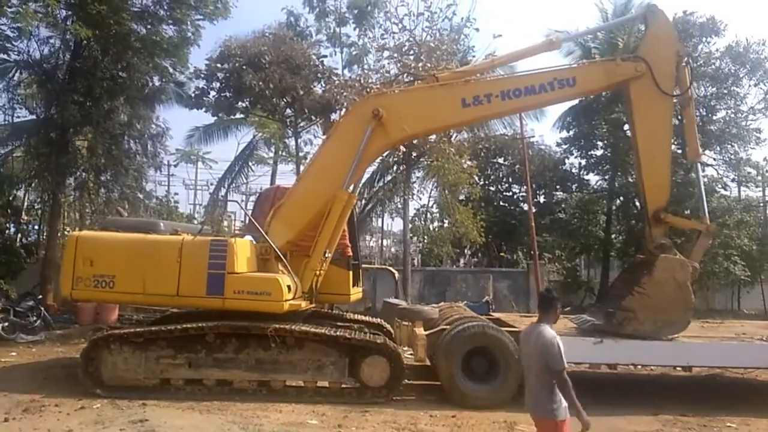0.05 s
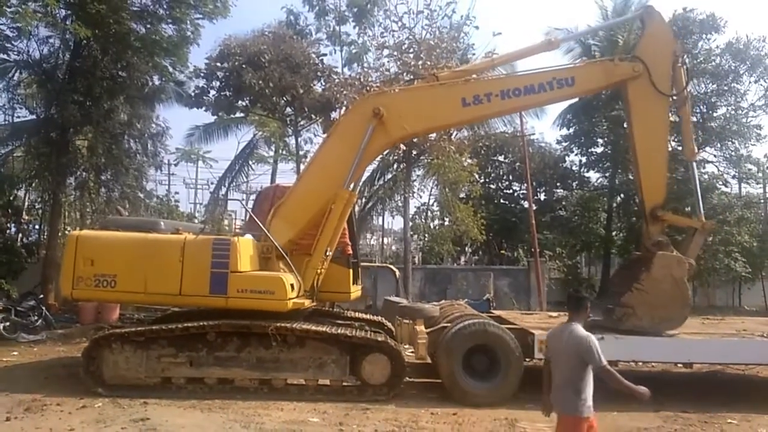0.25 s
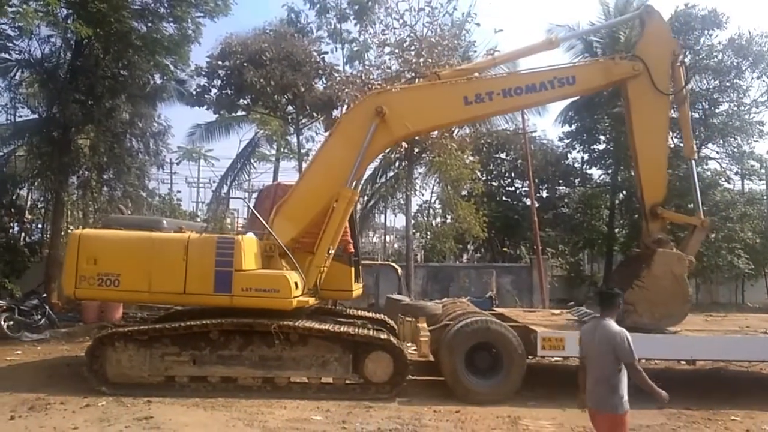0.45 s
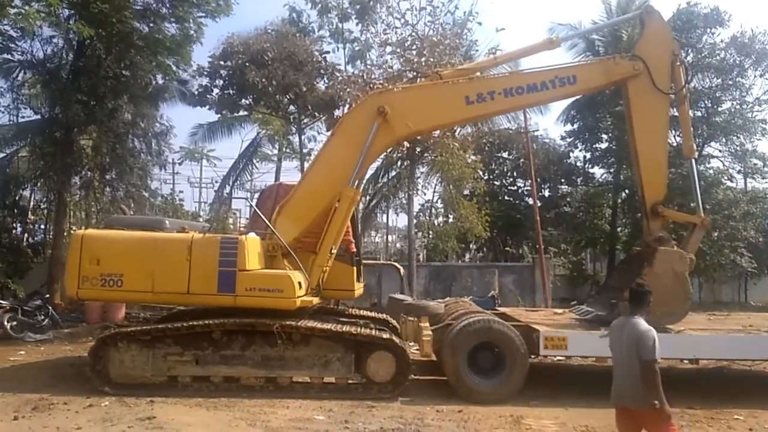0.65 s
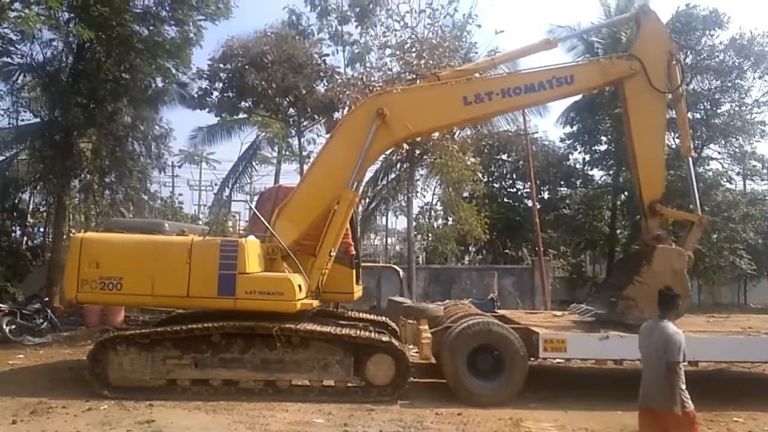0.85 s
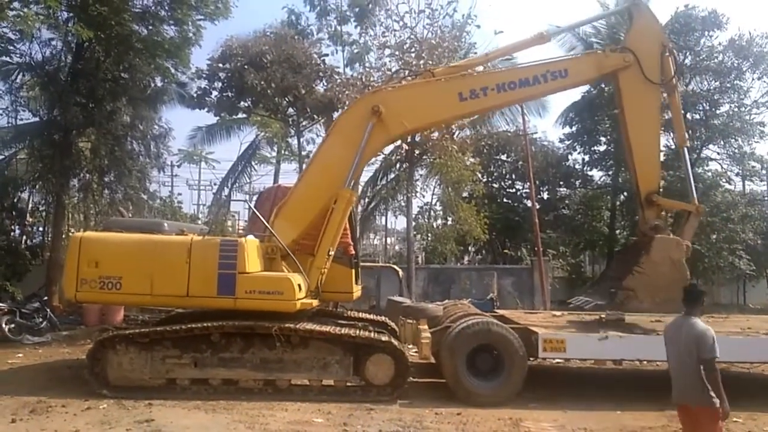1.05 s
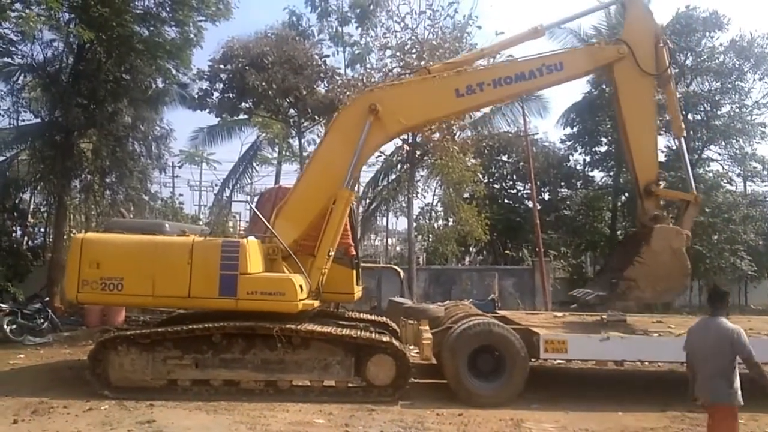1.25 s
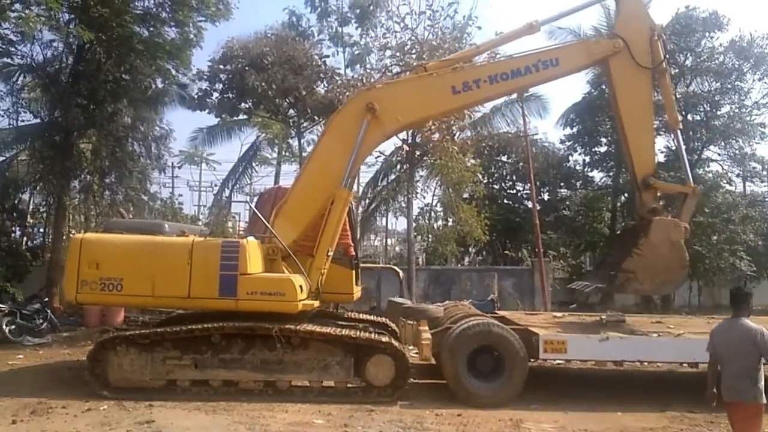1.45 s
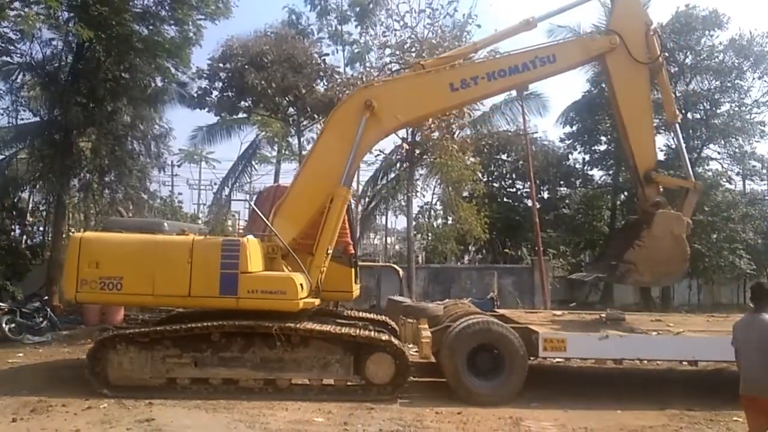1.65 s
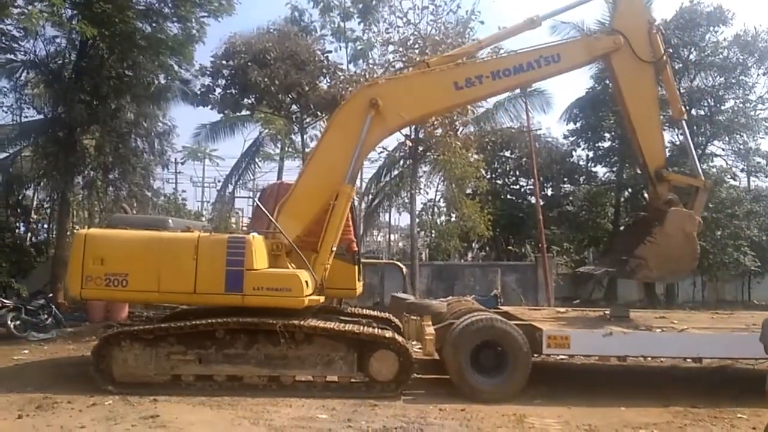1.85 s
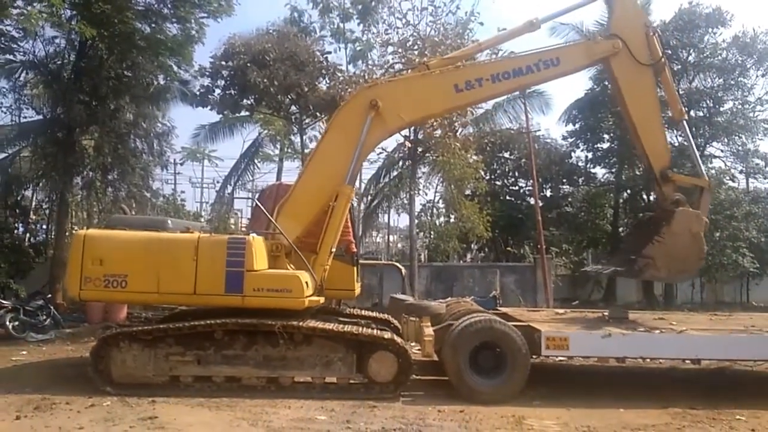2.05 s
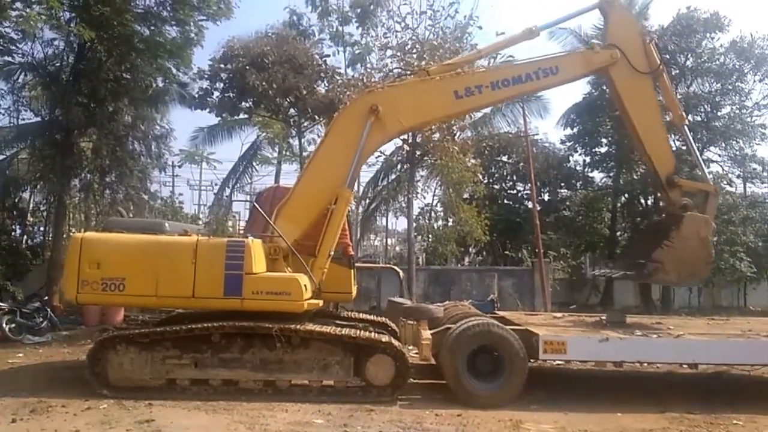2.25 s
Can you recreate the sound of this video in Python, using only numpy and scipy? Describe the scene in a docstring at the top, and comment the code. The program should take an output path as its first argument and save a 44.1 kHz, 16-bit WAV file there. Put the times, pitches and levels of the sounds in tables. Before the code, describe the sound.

A steel trailer deck thumps under an excavator, slightly to the left. From about 0.2 seconds, quick clanging knocks and hollow booms pile over a low groan, loudest near 0.4 and fading by 0.8. A faint diesel hum, hydraulic whine and outdoor rumble continue underneath. Loose steel clinks at 1.8 seconds, drops with one sharp bang around 2.0, then clinks lightly near 2.3.

```python
"""An open lot, where an excavator shifts its weight against a steel low-bed trailer, left of the mics.
The hollow deck groans under the load, takes a run of heavy knocks that clang on its plate, and booms
as it rocks to rest on its shaking frame. Later loose steel clinks and drops with one sharp bang.
Underneath, the diesel hums faintly, its hydraulic pump whines and the open air rumbles and hisses."""
import sys
import numpy as np
from scipy import signal
from scipy.fft import rfft, irfft
from scipy.io import wavfile

SR = 44100
rng = np.random.default_rng(int(sys.argv[2]) if len(sys.argv) > 2 else 0)


def master_out(mix):
    """Clip the mix to full scale and print it as 16-bit PCM to the path in sys.argv[1]."""
    frames = np.transpose(np.atleast_2d(mix))
    ceiling = np.clip(frames, -1, 1)
    pcm = np.round(ceiling * 32767).astype(np.int16)
    wavfile.write(sys.argv[1], SR, pcm)


N = 105840
T = np.arange(N) / SR
FFT_SIZE = 2 ** 17
HZ = np.maximum(np.arange(FFT_SIZE // 2 + 1) * SR / FFT_SIZE, 1)
SIDES = np.array([[.5], [-.5]])  # splits a left-minus-right level between the two microphones
DECK_PAN_DB = 4.5

# how much louder the trailer's noise is at the left microphone: frequency_hz, left_minus_right_db
TRAILER_BALANCE = [(60, 3.5), (350, 3), (700, 4), (1300, -1.5), (2000, 6.5), (2800, 16), (4400, 4.5),
                   (8000, -0.5), (15000, 5)]


def deck_thumps():
    """The deck rocks: each thump booms in its hollow, flexes the frame and shoves it into ringing."""
    # thumps of the rocking deck: start_s, boom_db, boom_hz, frame_db, flex_hz
    thumps = [(0.229, -26.5, 305, -29.5, 175), (0.255, -24, 290, -23.5, 158), (0.285, -17.5, 294, -42, 150),
              (0.312, -22.5, 297, -28.5, 106.4), (0.338, -19, 298, -29.5, 178),
              (0.348, -10, 291.2, -40.5, 150), (0.377, -35, 266, -23.5, 122.2),
              (0.429, -13, 304, -22.5, 184), (0.446, -6, 300.4, -25, 152.4), (0.494, -20, 292.4, -25, 192),
              (0.511, -14, 295, -28.5, 207), (0.560, -15, 316, -39, 200), (0.588, -19, 312.6, -36, 192),
              (0.621, -21.5, 274.7, -46, 140), (0.662, -26.5, 299, -44, 171.2),
              (0.704, -34.5, 286.5, -63, 180), (0.739, -39, 262, -55, 179), (1.18, -50, 187, -53, 164)]
    # resonances of the frame: pitch_hz, gain_db, t60_s
    frame_modes = [(54, -12, 0.17), (83.4, -18, 0.19), (96, -17, 0.15), (116, -10, 0.57),
                   (131.8, -5.5, 0.553), (157.2, -1, 0.21), (204.6, 2, 0.23), (231.4, -13, 0.34),
                   (255.6, -12.5, 0.55), (326.6, 0, 0.5), (392.5, -1.5, 0.2), (465.6, -11.5, 1)]
    swell_s, push_s = 0.007, 0.012
    booms, shake = 0, 0
    for start_s, boom_db, boom_hz, frame_db, flex_hz in thumps:
        boom = from_db(boom_db) * note(start_s, boom_hz, swell_s, t60_s=0.093)
        flex = from_db(frame_db + 4.5) * note(start_s, flex_hz, swell_s, t60_s=0.07)
        hollow_tail = from_db(boom_db - 23.5) * note(start_s, 297.5, swell_s, t60_s=0.3)
        booms = booms + boom + flex + hollow_tail
        age = np.maximum(T - start_s, 0)
        shake = shake + from_db(frame_db) * age / push_s * np.exp(1 - age / push_s)
    pushes = shake * rng.standard_normal(N) / np.sqrt(2 * push_s * SR)
    low_band = signal.butter(2, [76.6, 504], "band", fs=SR, output="sos")
    frame = from_db(-8.5) * ring(signal.sosfilt(low_band, pushes), frame_modes)
    return pan(DECK_PAN_DB) * (booms + frame)


def deck_knocks():
    """Heavy knocks ring the deck plate, each with a clang whose pitch is set by where it lands."""
    # blows on the deck: start_s, level_db, length_s, treble_db, dull_above_hz, ring_db, ring_hz
    knocks = [(0.003, -66.5, .06, 27.5, 4000, -58, 730), (0.073, -59.5, 0.033, 23.5, 9000, -47.5, 737),
              (0.162, -42.5, 0.03, -5, 2500, -38.5, 761), (0.227, -28, 0.029, 11, 1700, -20.5, 726.3),
              (0.281, -25, 0.03, -8, 8500, -16, 712.7), (0.303, -27, .035, -10, 3500, -20, 776),
              (0.3365, -23.5, 0.036, 3.5, 14250, -18.5, 638), (0.365, -37.5, 0.012, 0.5, 3000, -28.5, 799),
              (0.428, -31, 0.02, 1, 4000, -25, 588), (0.452, -39, .02, -2, 3000, -32.5, 686),
              (0.496, -45.5, 0.022, 2.5, 6000, -34.5, 658), (0.557, -41, 0.048, -3.5, 2520, -46, 756)]
    # spectrum of a knock: frequency_hz, gain_db
    spectrum = [(40, -23.5), (90, 0.5), (200, -2.5), (400, -10), (520, -10.5), (640, -3.5), (745, 3.5),
                (900, -8), (1100, -12), (1900, -19), (2400, -29.5), (3400, -26.5), (4500, -37),
                (5300, -36.5), (7000, -46), (10000, -42.5), (14000, -58)]
    # overtones of the clang: pitch_ratio, gain_db
    partials = [(1, 0.5), (1.125, -6.5), (1.47, -17), (1.72, -20.5), (2.64, -32)]
    # resonances of the plate: pitch_hz, gain_db, t60_s
    plate_modes = [(589, 0, 0.3), (670, 5, 0.19), (739, 3, 0.17), (826, -6.5, 0.177), (1060, -9, 0.11),
                   (1170, -9.5, .1)]
    impacts = blows(knocks, spectrum, sag_db_per_s=75, cutoff_db_per_s=689,
                    hiss_db=-10, hiss_db_per_s=112.5, grain_db=1)
    clang = pan(DECK_PAN_DB) * clangs(knocks, partials, swell_s=0.003, t60_s=0.11)
    return with_ring(impacts, plate_modes, ring_db=-8) + clang


def deck_groan():
    """The deck creeps under the load with a low, hollow groan."""
    # rise and fall of the groan: time_s, level_db
    loudness = [(0, -36.5), (0.1, -39.5), (0.2, -33.5), (0.3, -28.5), (0.55, -27), (0.68, -32.5),
                (0.77, -46), (0.84, -53.5), (1.0, -72)]
    # spectrum of the groan: frequency_hz, gain_db
    spectrum = [(40, -48.5), (85, -23.5), (140, -16.5), (200, -11.5), (235, -1), (262, -7), (292, -0.5),
                (330, -5), (365, -9), (400, -9), (520, -25), (640, -24.5), (760, -26), (1100, -40.5),
                (2100, -57), (3100, -52.5), (4400, -65), (8000, -79)]
    return level(loudness) * colour(stereo_noise(TRAILER_BALANCE), unit_gain(spectrum))


def loose_steel():
    """Loose steel pieces strike and ring, their rattling pings well to the left."""
    # steel strikes: start_s, level_db, length_s, treble_db, dull_above_hz, ring_db, ring_hz
    clanks = [(1.8155, -43.5, 0.032, 0.5, 8000, -45, 2980), (1.971, -47, 0.029, 1, 6400, -44.5, 3310),
              (2.006, -42.5, 0.011, 5, 4650, -45, 1626), (2.0262, -30, 0.019, 3.5, 15800, -26, 1950),
              (2.266, -58, 0.017, 9, 6370, -56.5, 2750), (2.305, -50.5, 0.011, 2.5, 4000, -54, 1710),
              (2.331, -48.5, 0.017, 5.5, 4660, -49, 2990), (2.346, -52.5, 0.022, 1.5, 3500, -42, 1497)]
    # spectrum of a strike: frequency_hz, gain_db
    spectrum = [(60, -41), (200, -5.5), (380, -2.5), (560, -1), (750, 0.5), (1000, -8), (1250, 6),
                (1550, -3.5), (1950, 0), (2550, -8), (3100, -9), (3900, -7.5), (5000, -8), (6600, -17.5),
                (9200, -11.5), (11000, -19.5), (15000, -33)]
    # overtones of a piece's ping: pitch_ratio, gain_db
    partials = [(0.835, -13), (1, 0), (1.046, -12), (1.23, -22), (1.669, -17), (2.61, -19)]
    # resonances of the steel: pitch_hz, gain_db, t60_s
    steel_modes = [(414.6, -6, 0.26), (732, -12, 0.23), (1184, -2, 0.087), (1655, -4, 0.19),
                   (1950, -1, 0.076), (2402, 1, 0.1), (3220, -8.5, 0.17), (5100, -4, .04), (9500, -23, .1)]
    strikes = blows(clanks, spectrum, sag_db_per_s=137, cutoff_db_per_s=307,
                    hiss_db=-6.5, hiss_db_per_s=174, grain_db=1)
    pings = pan(10) * clangs(clanks, partials, swell_s=0.0032, t60_s=0.091) * flutter(rate_hz=450)
    return with_ring(strikes, steel_modes, ring_db=-6) + pings


def steel_drop():
    """The steel's weight lands behind the bang: dull blows, a short rattling ring and a bass thud."""
    # landings: start_s, level_db, length_s, treble_db, dull_above_hz, ring_db, ring_hz
    drops = [(2.029, -32, 0.019, 0, 9000, -39, 744), (2.05, -35.5, 0.016, 1, 9100, -32, 401),
             (2.061, -39.5, 0.01, 2, 6000, -31.5, 749)]
    # spectrum of a landing: frequency_hz, gain_db
    spectrum = [(40, -13), (90, -15.5), (220, -13.5), (330, -3), (430, 4.5), (560, -6), (750, 7.5),
                (950, -3.5), (1250, -8.5), (2000, -12), (3000, -27.5), (9000, -40.5)]
    # overtones of the landing weight: pitch_ratio, gain_db
    partials = [(1, 0), (1.21, -8), (1.75, -19.5)]
    weight = blows(drops, spectrum, sag_db_per_s=29.5, cutoff_db_per_s=914,
                   hiss_db=-18.5, hiss_db_per_s=24, grain_db=2.5)
    thud = from_db(-38) * bell_curve(middle_s=2.047, half_s=0.028) * tone(99, waver=0.028)
    rattle = clangs(drops, partials, swell_s=0.0039, t60_s=0.057) * flutter(rate_hz=300)
    return weight + pan(DECK_PAN_DB) * (rattle + thud)


def excavator():
    """The diesel's firing tone sags under load, the hydraulic pump whines and strained steel creaks."""
    # firing tone of the diesel: time_s, pitch_hz, level_db
    firing_curve = [(0, 80.8, -49), (0.72, 79.74, -53), (0.9, 79.34, -48), (1.021, 74.3, -72),
                    (1.18, 73.3, -48), (1.58, 74.9, -50), (1.68, 74, -63), (2.049, 70.9, -63),
                    (2.4, 71.3, -73)]
    # tones of the pump: pitch_hz, gain_db
    whines = [(443, 2.5), (667, -0.5), (745, -4.5), (890, -3), (2003, -4), (2115, -8), (2223, -8.5)]
    # loudness of the working pump: time_s, level_db
    pump_load = [(0, -73.5), (0.8, -79), (1.15, -63.5), (1.6, -66.5), (1.8, -71), (2.1, -71), (2.4, -72)]
    # faint hums of strained steel: middle_s, half_length_s, pitch_hz, level_db
    strains = [(1.699, 0.033, 223.6, -51), (1.806, 0.041, 212.7, -54), (1.976, 0.065, 205, -55.5),
               (2.185, 0.24, 454.4, -57)]
    time_s, firing_hz, firing_db = np.transpose(firing_curve)
    firing = from_db(np.interp(T, time_s, firing_db)) * tone(np.interp(T, time_s, firing_hz), 0.0015)
    pump = sum(from_db(db) * tone(hz, waver=0.007) * flutter(rate_hz=40) for hz, db in whines)
    creaks = sum(from_db(db) * bell_curve(middle_s, half_s) * tone(hz, waver=0.0298)
                 for middle_s, half_s, hz, db in strains)
    return pan(5.5) * (firing + level(pump_load) * pump + creaks)


def open_lot():
    """Soft rumble and hiss of the open air around the microphones."""
    # spectrum of the air: frequency_hz, gain_db
    spectrum = [(20, -20.5), (42, -10), (70, -7.5), (103, -14.5), (211, -17.5), (300, -20), (490, -25),
                (680, -21), (900, -21.5), (1050, -25.5), (2100, -25.5), (2550, -34.5), (3300, -37),
                (4400, -44.5), (5600, -41), (7200, -48), (8600, -43.5), (11000, -45.5), (15000, -64)]
    # the recorder's gain dips under the knocks, then the background comes back up: time_s, level_db
    floor_level = [(0, -51), (0.7, -54.5), (0.84, -52), (0.96, -49.5), (1.5, -51), (1.75, -50.5),
                   (2.15, -48), (2.4, -49.5)]
    # the air's lean toward the left microphone: frequency_hz, left_minus_right_db
    balance = [(60, 6), (400, 4), (1300, 7), (2400, 3), (4400, 10), (8000, -1.5), (15000, 2)]
    return level(floor_level) * colour(stereo_noise(balance), unit_gain(spectrum))


def blows(rows, spectrum, sag_db_per_s, cutoff_db_per_s, hiss_db, hiss_db_per_s, grain_db):
    """Each blow is a short noise burst, held briefly, then cut off by the recorder's noise suppression."""
    # faint 5-6 kHz hiss that the recorder's processing leaves after each blow: frequency_hz, gain_db
    hiss_spectrum = [(300, -6), (2000, -8.5), (4600, -9.5), (5200, 7), (6000, 10.5), (6700, 3), (11000, 7)]
    treble_hz, attack_cycles = 1200, 5.7
    body = unit_gain(spectrum)
    treble_shelf = 1 / (1 + (treble_hz / HZ) ** 4)
    noise = stereo_noise(TRAILER_BALANCE) * flutter(rate_hz=1500, depth_db=grain_db)
    recorder_hiss = colour(stereo_noise(TRAILER_BALANCE), from_db(over_hz(hiss_spectrum)))
    out = 0
    for start_s, level_db, length_s, treble_db, dull_hz, *_ in rows:
        age = np.maximum(T - start_s, 0)
        burst = noise * from_db(-sag_db_per_s * age - cutoff_db_per_s * np.maximum(age - length_s, 0))
        hiss = recorder_hiss * from_db(hiss_db - hiss_db_per_s * age)
        attack = np.minimum(age * dull_hz / attack_cycles, 1)  # duller blows rise more slowly
        lowpass = 1 / np.sqrt(1 + (HZ / dull_hz) ** 8)
        gain = body * lowpass * from_db(level_db + treble_db * treble_shelf)
        out = out + colour((burst + hiss) * attack, gain)
    return out


def clangs(rows, partials, swell_s, t60_s):
    """Each blow rings at its own pitch, with inharmonic partials."""
    return sum(from_db(ring_db + db) * note(start_s, ring_hz * ratio, swell_s, t60_s)
               for start_s, *_, ring_db, ring_hz in rows for ratio, db in partials)


def note(start_s, hz, swell_s, t60_s):
    """One struck resonance of height 1 that swells quickly and dies away."""
    age = np.maximum(T - start_s, 0)
    envelope = (1 - np.exp(-(age / swell_s) ** 2)) * np.exp(-np.log(1000) * age / t60_s)
    return envelope / envelope.max() * np.sin(2 * np.pi * hz * age)


def with_ring(x, modes, ring_db):
    """The blows plus the modes they excite, at ring_db relative to the blows."""
    return x + from_db(ring_db) * x.std() * unit_rms(ring(x, modes))


def ring(x, modes):
    """Resonators driven by x; a click sets off a decaying sine in each."""
    out = 0
    for hz, db, t60_s in modes:
        radius, angle = np.exp(-np.log(1000) / (t60_s * SR)), 2 * np.pi * hz / SR
        feedback = [1, -2 * radius * np.cos(angle), radius ** 2]
        out = out + from_db(db) * signal.lfilter([0, np.sin(angle)], feedback, x + 1e-18)
    return out


def tone(hz, waver):
    """A sine of unit power whose pitch wanders by the fraction waver."""
    return np.sqrt(2) * np.sin(2 * np.pi * np.cumsum(hz * (1 + waver * drift(25))) / SR)


def stereo_noise(balance):
    """Noise at two microphones: alike in the bass, largely unrelated in the treble."""
    # likeness of left and right: frequency_hz, correlation
    likeness = [(60, 1), (290, 0.94), (740, 0.66), (1400, -0.08), (3100, -0.38), (7000, 0.012),
                (15000, -0.13)]
    alike = np.clip(over_hz(likeness), -.99, .99)
    mid, side = rfft(rng.standard_normal((2, FFT_SIZE)))
    pair = np.sqrt((1 + alike) / 2) * mid + np.sqrt((1 - alike) / 2) * side * 2 * SIDES
    return irfft(pair * pan(over_hz(balance)))[:, :N]


def colour(x, gain):
    """Causal (minimum-phase) filter with the given gain per frequency."""
    cepstrum = irfft(np.log(gain + 1e-7))
    cepstrum[..., 1:FFT_SIZE // 2] *= 2
    cepstrum[..., FFT_SIZE // 2 + 1:] = 0
    return irfft(rfft(x, FFT_SIZE) * np.exp(rfft(cepstrum)))[..., :N]


def flutter(rate_hz, depth_db=3.5):
    """A randomly flickering gain of unit power."""
    return unit_rms(from_db(depth_db * drift(rate_hz)))


def drift(rate_hz):
    """A line through random values, rate_hz of them a second."""
    knots = rng.standard_normal(8192)
    return np.interp(T * rate_hz, np.arange(len(knots)), knots)


def bell_curve(middle_s, half_s):
    """A smooth rise and fall around middle_s."""
    return np.exp(-((T - middle_s) / half_s) ** 2)


def level(points):
    """Gain over time from time_s, level_db points."""
    return from_db(np.interp(T, *np.transpose(points)))


def unit_gain(spectrum):
    """Filter gains of unit power from frequency_hz, gain_db points."""
    return unit_rms(from_db(over_hz(spectrum)))


def over_hz(points):
    """Spread frequency_hz, value points over all frequencies."""
    hz, value = np.transpose(points)
    return np.interp(np.log(HZ), np.log(hz), value)


def pan(left_minus_right_db):
    """Gains at the left and right microphones."""
    return from_db(SIDES * left_minus_right_db)


def from_db(db):
    """Decibels to gain."""
    return 10 ** (np.asarray(db) / 20)


def unit_rms(x):
    """Scale to unit power."""
    return x / np.sqrt(np.mean(x ** 2) + 1e-20)


def scene():
    """Trailer deck, loose steel, machine and air as they reach the microphones."""
    deck = deck_thumps() + deck_groan() + deck_knocks()
    return deck + loose_steel() + steel_drop() + excavator() + open_lot()


def record(dry):
    """The recorder cuts the top steeply above 15.2 kHz."""
    return signal.sosfilt(signal.ellip(10, .1, 80, 15200, fs=SR, output="sos"), dry)


dry = scene()
out = record(dry)
master_out(out)
```